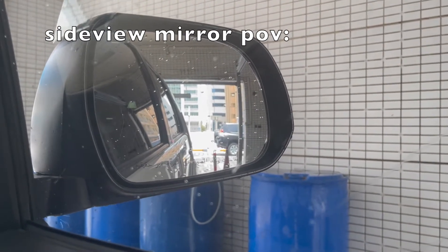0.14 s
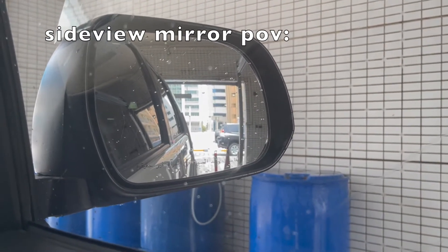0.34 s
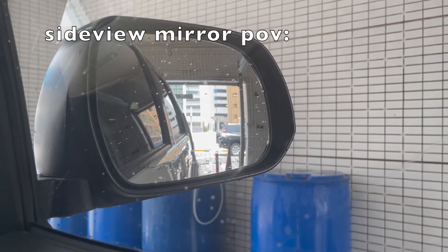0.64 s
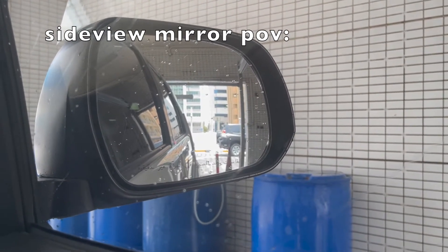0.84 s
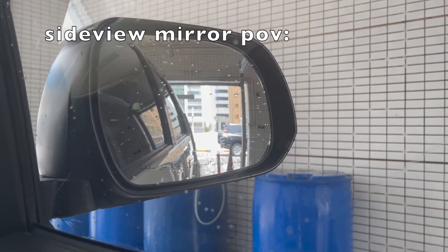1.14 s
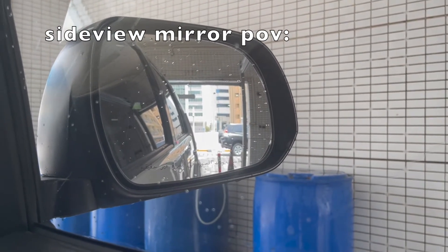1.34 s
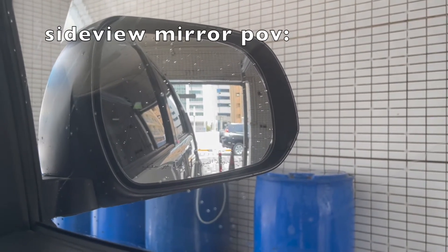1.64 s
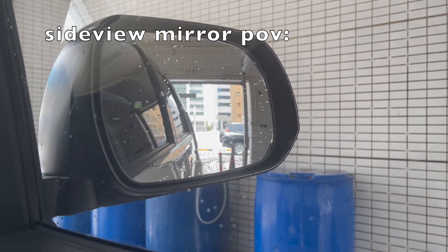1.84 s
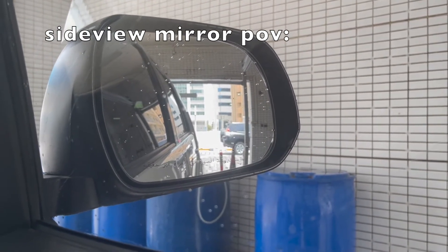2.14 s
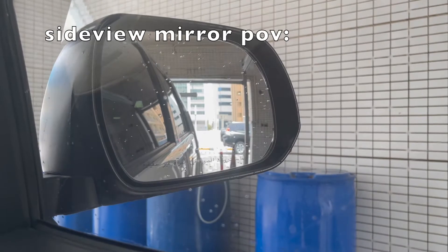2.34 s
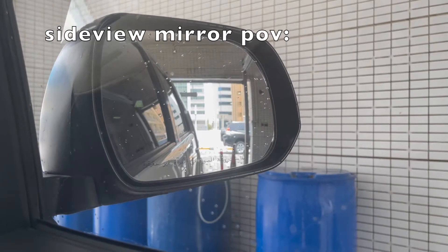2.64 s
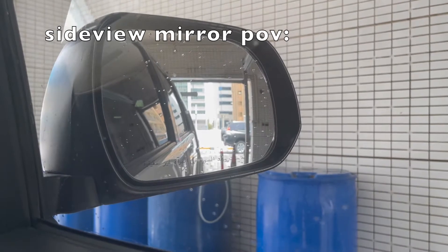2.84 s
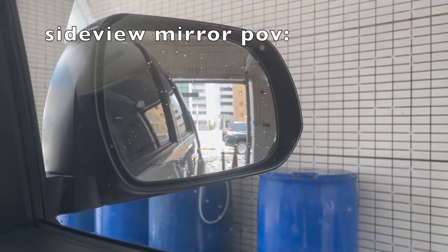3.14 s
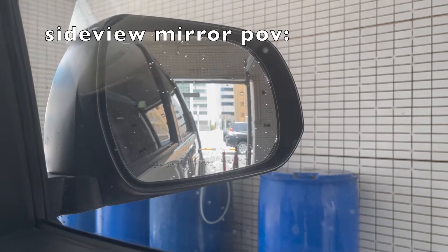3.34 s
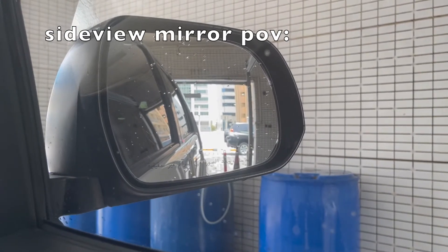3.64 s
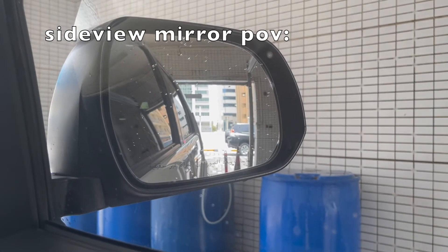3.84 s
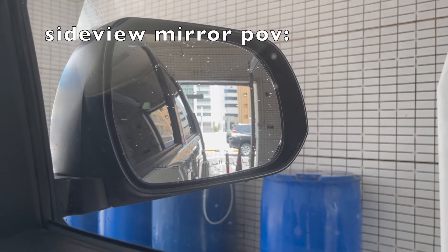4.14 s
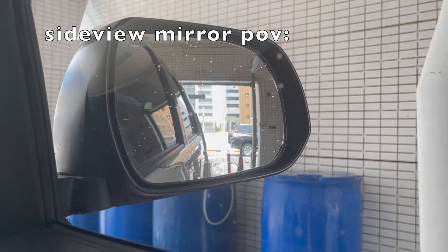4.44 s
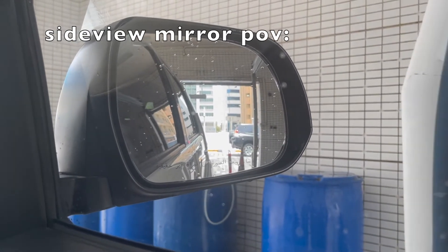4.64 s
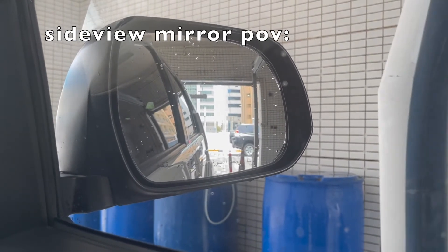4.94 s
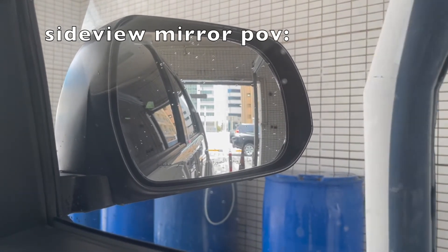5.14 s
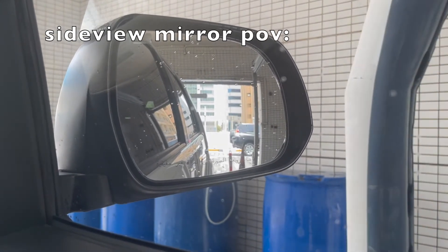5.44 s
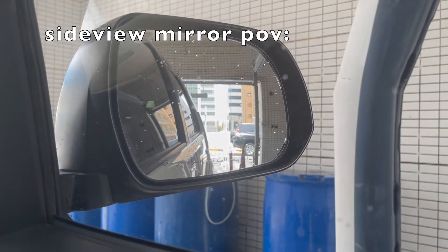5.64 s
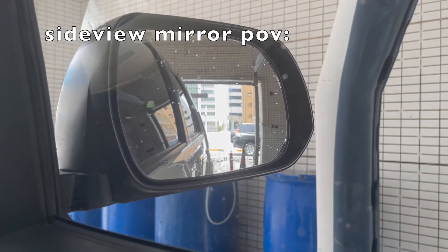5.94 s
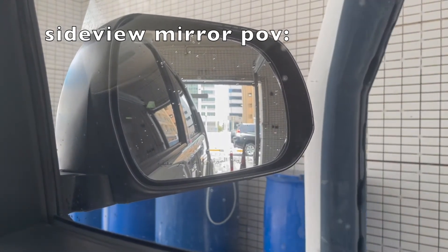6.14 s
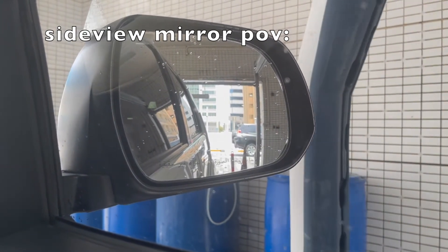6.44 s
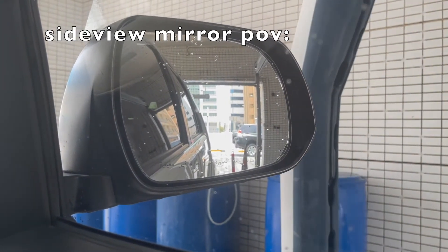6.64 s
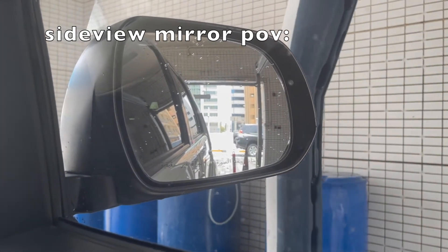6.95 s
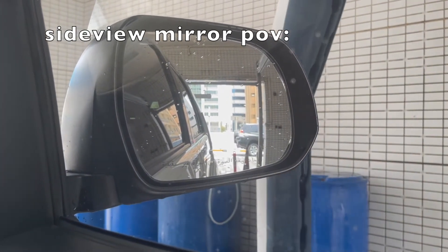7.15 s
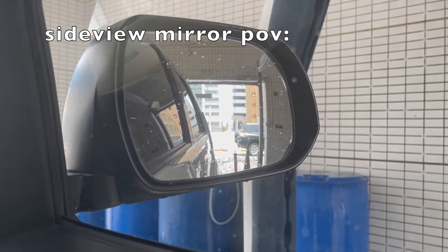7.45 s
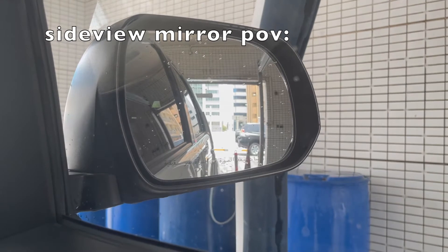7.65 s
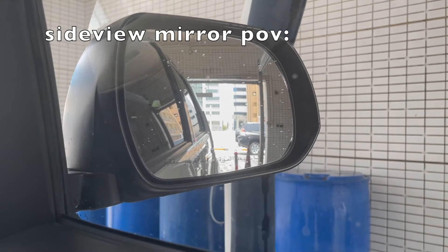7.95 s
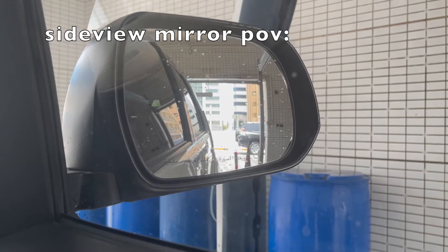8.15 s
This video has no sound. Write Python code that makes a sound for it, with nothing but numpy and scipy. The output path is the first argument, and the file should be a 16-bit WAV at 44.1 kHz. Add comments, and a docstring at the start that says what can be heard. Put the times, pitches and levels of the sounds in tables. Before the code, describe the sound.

Car wash dryer blowers roar over a slowly rolling car, the air stream buffeting and slapping its side window while the cabin booms low.

```python
"""A tiled car wash bay: a car creeps under the dryer blowers, heard at its side window.
Random eddies of the air stream buffet and flutter, hard ones slap, and the cabin booms and throbs.
Shaped noise makes the blowers' roar and hiss, rippled by the tiled walls, and the nozzles' sizzle.
Sizzle, fan drone and roar each swell and sink as the car passes; two drops tick.
The recorder's limiter holds the peaks."""
import sys
import numpy as np
from scipy import signal
from scipy.fft import rfft, irfft, next_fast_len
from scipy.io import wavfile
from scipy.ndimage import uniform_filter1d, minimum_filter1d, map_coordinates

SR = 44100
rng = np.random.default_rng(int(sys.argv[2]) if len(sys.argv) > 2 else 0)


def master_out(mix):
    """Clip the mix to full scale and print it as 16-bit PCM to the path in sys.argv[1]."""
    frames = np.transpose(np.atleast_2d(mix))
    ceiling = np.clip(frames, -1, 1)
    pcm = np.round(ceiling * 32767).astype(np.int16)
    wavfile.write(sys.argv[1], SR, pcm)


N = 365140

# hardest eddies at the window: (time [s], relative peak [dB], crest pitch [Hz], relative snap level [dB])
SLAP_EVENTS = [(0.098, -12.5, 520, -29), (0.223, -13, 505, -40.5), (0.26, -5.5, 435, -48),
               (0.279, -11.5, 417, -50), (0.313, -8.5, 415, -36), (0.349, -9.5, 428, -33),
               (0.452, -8.5, 715, -25), (0.547, -8.5, 405, -40.0), (0.62, -9.5, 533, -35),
               (0.694, -11.5, 452, -41.5), (0.723, -11, 517, -39), (0.727, -9, 416, -40),
               (0.783, -8, 432.2, -40.5), (1.001, -11, 484, -31.5), (1.05, -3.5, 377, -23.5),
               (1.3825, -7, 622, -18), (1.387, -3.5, 525, -26.5), (1.409, -13, 400, -37),
               (1.456, -8.5, 423, -43.5), (1.531, -27, 495, -27.5), (1.791, -10.5, 465, -41),
               (1.848, -3, 392, -34), (2.207, -15.5, 462, -25), (2.338, -6.5, 427, -33.5),
               (2.359, -6.5, 379, -40.0), (2.38, -11, 593, -30.5), (2.492, -6.5, 427, -41),
               (2.542, -11, 433, -33.5), (2.575, -7.5, 455, -38), (2.604, -7.5, 456, -35),
               (2.695, -5.5, 424, -40.5), (2.72, -6, 454, -24), (2.75, -10, 498, -30.5),
               (2.757, -4, 468, -31), (2.801, -11, 418, -31.5), (2.854, -3, 450, -34),
               (2.868, -6.5, 520, -27.5), (2.933, -10, 512, -34), (2.95, -4.5, 406.6, -45),
               (3.112, -9.5, 507, -33), (3.335, -6.5, 471, -45), (3.412, -9.5, 721, -23.5),
               (3.492, -5, 467, -38), (3.577, -8, 482, -28), (3.631, -9, 403, -38), (3.78, -14.5, 510, -29),
               (3.942, -3.5, 499, -38), (3.955, -7, 507, -36), (4.02, -1.5, 450, -30.5),
               (4.058, -8.5, 506, -20.5), (4.073, -3, 418, -29.5), (4.144, -11, 452, -32),
               (4.16, -6.5, 501, -33), (4.216, -19.5, 481, -34.5), (4.351, -3.5, 530, -37.5),
               (4.388, -13.5, 600, -23.5), (4.413, -5, 521, -30.5), (4.566, -13.5, 490, -28.5),
               (4.581, -8, 532, -27), (4.65, -10, 496, -34), (4.669, -4.5, 421, -29),
               (4.697, -12, 448, -36), (4.735, -7.5, 424, -42), (4.759, -6, 439, -24),
               (4.846, -9, 452, -43), (4.936, -8.5, 531, -35), (5.027, -8.5, 399, -33.5),
               (5.098, -8.5, 415, -38), (5.113, -7.5, 393, -38.5), (5.143, -12.5, 513, -28),
               (5.203, -8, 473, -32), (5.401, -10.5, 416, -36), (5.438, -12.5, 465, -28),
               (5.521, -10.5, 407, -43), (5.808, -9.5, 439, -38), (6.004, -5, 415, -25.5),
               (6.178, -13.5, 406, -37.5), (6.232, -7.5, 407, -30.5), (6.371, -11.5, 415, -29.5),
               (6.583, -3, 370, -40.0), (6.604, -6.5, 503, -30.5), (6.62, -9.5, 465, -34.5),
               (6.669, -11.5, 458, -27), (6.752, -8.5, 398, -42), (6.785, -6.5, 449, -37),
               (6.8049, -9, 493, -25.5), (6.851, -14.5, 485, -31.5), (6.867, -9.5, 445, -30.5),
               (6.872, -6, 520, -26.5), (6.907, -9.5, 400, -41), (6.964, -5, 507, -29),
               (6.985, -8, 419, -38.5), (6.993, -16, 450, -25.5), (7.13, -2, 448, -26.5),
               (7.146, -6, 388, -38.5), (7.176, -11.5, 484, -32), (7.2117, -9.5, 610, -19.5),
               (7.251, -17, 432, -32.5), (7.322, -8.5, 493, -34.5), (7.389, -10.5, 479, -39),
               (7.424, -9, 395, -41), (7.597, -10.5, 552, -26), (7.67, -3.5, 384, -36.5),
               (7.869, -5, 411, -31), (7.953, -2.5, 399, -39.5), (8.048, -9.5, 485, -40)]
# roughness of the stream at the window: (time [s], relative eddy level [dB])
ROUGHNESS = [(0, -27), (.2, -26.5), (.28, -21.5), (.5, -25.5), (.75, -18), (.9, -26.5), (1.05, -18.5),
             (1.35, -21), (1.68, -23.5), (1.83, -17), (1.97, -25), (2.2, -17), (2.8, -23), (3.1, -21),
             (4.05, -19), (4.7, -21), (5.5, -22.5), (6.45, -24.5), (6.9, -24.5), (7.06, -26), (7.25, -21.5),
             (7.78, -25.5), (8.05, -22.5), (8.28, -23.5)]


def amp(db):
    """Decibels to gain."""
    return 10 ** (np.asarray(db) / 20)


def unit(x):
    """x at rms 1."""
    return x / np.sqrt(np.mean(x ** 2) + 1e-20)


def clock():
    """The time of each sample in seconds."""
    return np.arange(N) / SR


def along(points, hz):
    """(Hz, value) points read on a log frequency axis."""
    point_hz, values = np.transpose(points)
    return np.interp(np.log(hz + 1), np.log(point_hz + 1), values)


def curves(rows):
    """One value per sample for each column after the time."""
    s, *columns = np.transpose(rows)
    return [np.interp(clock(), s, column) for column in columns]


def wobble(knots_per_s):
    """A smooth random curve through normally distributed knots."""
    knots = rng.standard_normal(int(N * knots_per_s / SR) + 4)
    return map_coordinates(knots, [np.arange(N) * knots_per_s / SR])


def passing(nearest_s, approach_s, leave_s, gain_db):
    """The bell-shaped swell in dB of a source that the car rolls past."""
    lag_s = clock() - nearest_s
    width_s = np.where(lag_s < 0, approach_s, leave_s)
    return gain_db * np.exp(-(lag_s / width_s) ** 2)


def filtered(x, response):
    """x times a complex response of frequency."""
    size = next_fast_len(N + SR // 2)
    hz = np.fft.rfftfreq(size, 1 / SR)
    return irfft(rfft(x, size) * response(hz), size)[..., :N]


def resonance(hz, centre_hz, width_hz):
    """Response of one damped mode, 1 at its centre."""
    return 1j * hz * width_hz / (centre_hz ** 2 - hz ** 2 + 1j * hz * width_hz)


def noise(apart_db):
    """White stereo noise whose side part lies apart_db above its mid part."""
    mid, side = rng.standard_normal((2, N))
    side = amp(apart_db) * side
    return np.array([mid + side, mid - side])


def rush(spectrum, apart_db):
    """Turbulence as stereo noise of rms 1 with the given spectrum."""
    return unit(filtered(noise(apart_db), lambda hz: amp(along(spectrum, hz))))


def blown(modes, apart_db):
    """Modes kept ringing by turbulence: noise through squared mode magnitudes, rms 1."""
    def response(hz):
        return sum(amp(db) * abs(resonance(hz, c, w)) ** 2 for c, w, db in modes)
    return unit(filtered(noise(apart_db), response))


def ducted(x):
    """Blower housings and ducts raise or lower the noise around their resonances."""
    # (centre [Hz], width [Hz], gain at centre [dB])
    ducts = [(238, 33, 9), (684, 130, 2.5), (1500, 430, -1.5), (2370, 90, -1), (3000, 150, -2.5),
             (3500, 220, 2.2), (4200, 440, -4), (5650, 250, 0), (6260, 390, 4.5)]

    def response(hz):
        return amp(sum(db * abs(resonance(hz, c, w)) ** 2 for c, w, db in ducts))
    return filtered(x, response)


def bay_roar():
    """The blowers' broadband roar and hiss come off the tiles from all sides; the roar swells in passing."""
    # car past the blowers: (nearest [s], approach [s], leave [s], gain when nearest [dB])
    blower_pass = (3.72, 1.9, 2.86, 5.3)
    # hiss in the bay: (time [s], relative level [dB])
    hiss_level = [(0, -47), (1.1, -46.5), (2.3, -45.5), (3.3, -46), (4.15, -49.5), (6.2, -49.5), (7, -49.5),
                  (7.6, -52), (8.28, -52)]
    # spectra: (frequency [Hz], relative level [dB])
    roar_spectrum = [(40, -18.5), (100, 16.5), (250, 8), (400, 6.5), (650, 8.5), (850, 5), (1100, -2),
                     (1500, -3), (2000, -12), (3000, -25), (6000, -51.5)]
    hiss_spectrum = [(600, -28.5), (1500, 1), (2400, 2), (3500, -1.5), (4700, -5), (6000, -9), (7200, -13),
                     (8600, -9.5), (10000, -30), (12500, -35.5)]
    start_db, fall_db_per_s = -31, 0.44
    roar_db = start_db - fall_db_per_s * clock() + passing(*blower_pass)
    unrest_db = .4 * wobble(3.5) + .9 * wobble(45)
    roar = amp(roar_db + unrest_db) * rush(roar_spectrum, apart_db=0)
    hiss_db, = curves(hiss_level)
    hiss = amp(hiss_db + 0.37 * wobble(7.6)) * rush(hiss_spectrum, apart_db=-2.5)
    return ducted(roar + hiss)


def walls(x):
    """Tile-wall echoes as a fine random spectral ripple, different per port and shifting along the bay."""
    depth_db, knot_spacing_hz, knots_per_s = 2.5, 44.97, 1.2
    hz, t, bins = signal.stft(x, SR, nperseg=2048)
    knots = rng.standard_normal((2, 900, 40))  # port, frequency, time
    place = np.meshgrid(hz / knot_spacing_hz, t * knots_per_s, indexing="ij")
    ripple = np.array([map_coordinates(k, place, order=1, mode="mirror") for k in knots])
    ripple_db = depth_db * np.minimum(hz / 2000, 1)[:, None] * ripple  # shallower below 2 kHz
    return signal.istft(bins * amp(ripple_db), SR)[1][:, :N]


def fan_drone():
    """The fans' low, breathy note, a noise-driven mode, swells as the car rolls beneath them."""
    # car beneath the fans: (nearest [s], approach [s], leave [s], gain when nearest [dB])
    drone_pass = (3.18, 1.56, 1.3, 18)
    far_db = -36.5
    level_db = far_db + passing(*drone_pass) + 1.2 * wobble(9)
    return amp(level_db) * blown([(248, 66, 0)], apart_db=-19.5)  # centre Hz, width Hz, dB


def wandering(x, share):
    """x with its pitch drifting slowly by about the given share."""
    place = np.cumsum(1 + share * wobble(2.5))
    return np.array([map_coordinates(channel, [place], mode="mirror") for channel in x])


def nozzles():
    """Jets sizzle and excite nozzle modes, most when nearest; their lips whistle faintly throughout."""
    # car past the nearest nozzle: (nearest [s], approach [s], leave [s], gain when nearest [dB])
    nozzle_pass = (2.4, 1.44, 1.1, 8.1)
    # jet noise: (frequency [Hz], relative level [dB])
    sizzle_spectrum = [(4000, -39), (7200, -15.5), (8600, 1.5), (10000, 8), (11000, 0.5), (11700, -2.5),
                       (12400, -12.5)]
    # resonances of the nearest nozzle, lip whistles: (centre [Hz], width [Hz], relative level [dB])
    nozzle_modes = [(2373, 105, 6), (4016, 260, 1.5), (4330, 230, -1.5), (5300, 180, -4.5),
                    (7550, 220, -9.5), (8750, 500, -11), (11030, 140, -1)]
    whistle_modes = [(8238, 25, -4), (8435, 38, -4), (8700, 24, 1.5), (9000, 27, -1.5), (8980, 27, -3),
                     (9200, 27, -1), (9560, 20, -7)]
    start_db, fall_db_per_s = -59, 0.7
    jet_db = start_db - fall_db_per_s * clock() + passing(*nozzle_pass)
    sizzle = amp(jet_db + .5 * wobble(12)) * rush(sizzle_spectrum, apart_db=-29.5)
    modes = wandering(blown(nozzle_modes, apart_db=-11), share=.007)  # pitch wanders with the flow
    ring = amp(jet_db + 1.7 + 0.87 * wobble(7.2)) * modes
    whistle = amp(-68.5) * blown(whistle_modes, apart_db=-8)
    return sizzle + ring + whistle


def drops():
    """Each blown-off drop lands with one faint tick, a fast-decaying noise burst."""
    # (time [s], level at onset [dB])
    drop_events = [(0.221, -46), (6.068, -45)]
    # (frequency [Hz], relative level [dB])
    tick_spectrum = [(1500, -31), (3500, 0), (6000, -3), (9000, -14.5), (12000, -24)]
    decay_60db_s = 0.017
    t = clock()
    fading = sum((t > s) * amp(db - 60 * np.abs(t - s) / decay_60db_s) for s, db in drop_events)
    return fading * rush(tick_spectrum, apart_db=-7)


def throb():
    """Vortices locked onto the cabin's air resonance: a sine in firm swells that finally dies away."""
    # (time [s], pitch [Hz], relative level [dB])
    lock_in = [(0, 85.9, -13), (.22, 85.4, -13.5), (.35, 86.1, -23), (.55, 85.4, -18), (.7, 87.4, -8.5),
               (.88, 85.8, -13), (1.1, 84.5, -17.5), (1.33, 84.7, -10), (1.6, 83, -16), (1.9, 85, -13.5),
               (2.2, 81.4, -11.5), (2.33, 84, -27.5), (2.65, 87.05, -19), (2.92, 91, -15),
               (3.05, 89, -27.5), (4.5, 89.3, -50.5)]
    hz, db = curves(lock_in)
    phase = 2 * np.pi * np.cumsum(hz + .5 * wobble(10)) / SR
    return amp(db + 0.45 * wobble(6.5)) * unit(np.sin(phase))


def stray_slaps(count):
    """Lesser slaps at random times, stronger where the stream is rougher; rows like SLAP_EVENTS."""
    when, size, tone = rng.random((count, 3)).T
    s = when * N / SR
    db = np.interp(s, *np.transpose(ROUGHNESS)) + 9 - 1.5 * size
    hz = 429.8 * 2 ** (.5 * (tone - .5))  # up to a quarter octave either way
    return list(zip(s, db, hz, db - 24))


def slaps():
    """A hard eddy snaps crisply, swings a few times at a sagging pitch and ends in a low thump."""
    # crisp edge: (frequency [Hz], relative level [dB])
    edge_spectrum = [(350, -10), (700, 9), (1100, 4.5), (1600, -6.5), (2600, -24), (5000, -65),
                     (10000, -110)]
    rise_s, fall_s = 0.002, 0.0037
    sag_octaves, sag_s = 0.581, 0.0035  # sag either side of the crest pitch, and its time scale
    thump_hz, thump_db, thump_half_s, thump_lag_s = 254, -3, 0.0025, 0.0021
    snap_lead_s = .0014
    t = np.arange(-SR // 100, SR // 50) / SR
    swell = np.exp(-(t / np.where(t < 0, rise_s, fall_s)) ** 2)
    late = t - thump_lag_s
    thump_swell = amp(thump_db) * np.exp(-(late / thump_half_s) ** 2)
    puffs, snaps = np.zeros((2, N + SR))
    rows = SLAP_EVENTS + stray_slaps(count=110)
    for (s, db, pitch_hz, edge_db), phase in zip(rows, rng.random(len(rows))):
        hz = pitch_hz * 2 ** (-sag_octaves * np.tanh(t / sag_s))
        turns = phase + np.cumsum(hz) / SR
        # the thump takes over the swing's phase
        thump_turns = np.interp(thump_lag_s, t, turns) + thump_hz * late
        swing = swell * np.sin(2 * np.pi * turns)
        thump = thump_swell * np.sin(2 * np.pi * thump_turns)
        start = max(round((s + t[0]) * SR), 0)
        puffs[start:start + len(t)] += amp(db - 3) * (swing + thump)
        snaps[max(round((s - snap_lead_s) * SR), 0)] += amp(edge_db + 7.5)

    def edge(hz):
        gain = amp(along(edge_spectrum, hz))
        return gain / gain.mean()  # keeps the peak of each impulse
    return puffs[:N] + filtered(snaps[:N], edge)


def flutter_level():
    """Gain of the small eddies: gusty roughness plus a brief flurry around each tabled slap."""
    flurry_db, flurry_half_s, flurry_lag_s = -11.5, 0.0095, 0.0025
    rough_db, = curves(ROUGHNESS)
    gusty = amp(rough_db - 2.5 + 0.83 * wobble(24))
    t = clock()[::64]
    power = sum(amp(db) ** 2 * np.exp(-((t - s - flurry_lag_s) / flurry_half_s) ** 2)
                for s, db, _, _ in SLAP_EVENTS)
    flurry = amp(flurry_db) * np.interp(clock(), t, np.sqrt(power))
    return np.hypot(gusty, flurry)


def lulls():
    """Gain of the stream, which lets go of the window for a moment between gusts."""
    # (time [s], level change [dB])
    lull_events = [(0.416, -8), (0.986, -9.5), (1.429, -6.5), (2.268, -5), (2.668, -4), (3.522, 0.5),
                   (3.776, -15), (4.628, -6), (4.716, -10), (4.896, -7), (6.357, -4), (6.831, -13.5),
                   (7.361, -11), (7.477, -2), (7.908, -2)]
    half_s = 0.012
    return amp(sum(db * np.exp(-((clock() - s) / half_s) ** 2) for s, db in lull_events))


def air_stream():
    """Eddies sweep past the window, louder and brighter the faster; the stream makes the cabin air boom."""
    # (time [s], relative cabin boom level [dB], relative buffeting level [dB])
    stream = [(0, -17, -18.5), (.15, -13, -17), (1.2, -15, -16), (2.3, -14, -16), (2.55, -16, -15.3),
              (3.5, -18, -14), (4.0, -19, -14), (4.8, -20, -14.8), (5.25, -17, -14.5), (6.5, -19.5, -16),
              (7.2, -22, -13.5), (7.45, -16, -16), (7.8, -20.5, -18.5), (8.2, -18, -16.5),
              (8.24, -24.5, -30.5)]
    # cabin air modes: (centre [Hz], width [Hz], relative level [dB])
    cabin_modes = [(49, 26, -3.5), (64.8, 20, 3.5), (91, 26, 1)]
    # eddy spectra, large to small: (frequency [Hz], relative level [dB])
    buffet_spectrum = [(15, -38.5), (30, -24), (48, -17), (75, -2.5), (125, 0.5), (190, -5), (255, -6.5),
                       (340, -15), (480, -20), (800, -53.5), (1500, -100)]
    flutter_spectrum = [(100, -29.5), (220, -4), (340, 2), (480, -3.5), (640, -10), (900, -20),
                        (1500, -64.5), (3000, -91)]
    tearing_spectrum = [(200, -29.5), (450, -1.5), (650, 0.5), (900, -9.5), (1300, -16), (2200, -30),
                        (5000, -65)]
    boom_db, buffet_db = curves(stream)
    eddies = flutter_level()
    # no eddy runs much faster than the stream that carries it
    speed = unit(np.tanh(0.74 * (0.66 * wobble(35) + 0.75 * wobble(130))))

    def swept(db_per_speed, spectrum, apart_db):
        return unit(amp(db_per_speed * speed) * rush(spectrum, apart_db))
    boom = amp(boom_db + 1.5) * blown(cabin_modes, apart_db=-20)
    buffet = amp(buffet_db + 3) * swept(1.48, buffet_spectrum, apart_db=-20)
    flutter = eddies * amp(0.74) * swept(4.2, flutter_spectrum, apart_db=-17)
    tearing = eddies * amp(-18) * swept(6.1, tearing_spectrum, apart_db=-9)
    return boom + lulls() * (buffet + flutter + tearing)


def scene():
    """Near sounds reach the two microphone ports a little out of step; the bay surrounds them."""
    # direct sound: (frequency [Hz], phase by which left leads [rad])
    port_lead = [(40, .05), (120, .2), (250, .36), (2000, .4), (7500, .6), (8600, -.3), (9400, -1.6),
                 (11800, -6.2)]
    # left port closer to the stream: (frequency [Hz], left minus right [dB])
    port_tilt = [(100, 0.5), (250, 0.3), (600, 1.5), (1200, 2.5), (2200, 0.5), (4200, 1.5), (8000, 0)]
    sides = np.array([[1], [-1]])
    near = fan_drone() + nozzles() + drops() + throb() + slaps() + air_stream()
    near = filtered(near, lambda hz: np.exp(.5j * sides * along(port_lead, hz)))
    both = walls(bay_roar()) + near
    return filtered(both, lambda hz: amp(.5 * sides * along(port_tilt, hz)))


def limited(x, ceiling, hold_s):
    """A fast limiter ducks both channels around each peak."""
    size = max(int(hold_s * SR), 1)
    needed = np.minimum(1, ceiling / (np.abs(x).max(axis=0) + 1e-9))
    gain = minimum_filter1d(needed, 2 * size)
    smooth = uniform_filter1d(uniform_filter1d(gain, size), size)
    return x * smooth


def record(dry):
    """The recorder limits the peaks, then cuts everything above its band limit."""
    top_hz = 12350
    held = limited(dry, ceiling=.9, hold_s=.003)
    return filtered(held, lambda hz: hz < top_hz)


dry = scene()
out = record(dry)
master_out(out)
```